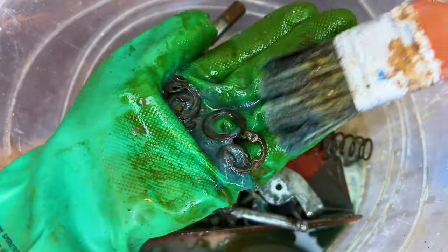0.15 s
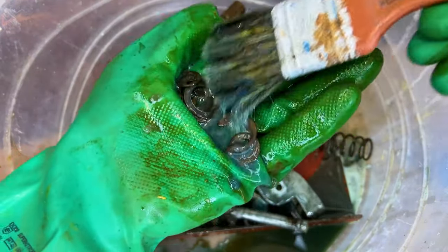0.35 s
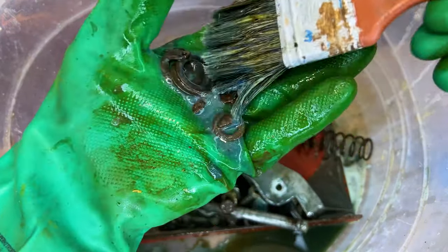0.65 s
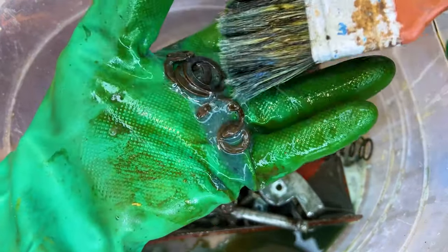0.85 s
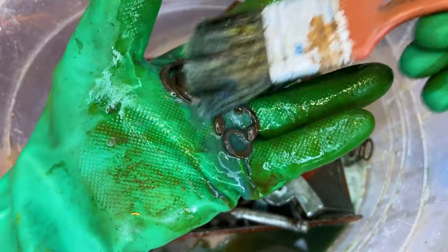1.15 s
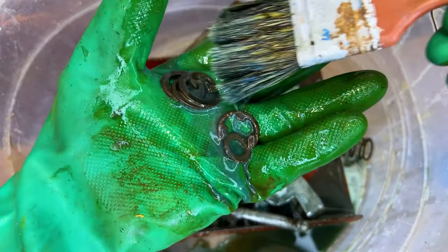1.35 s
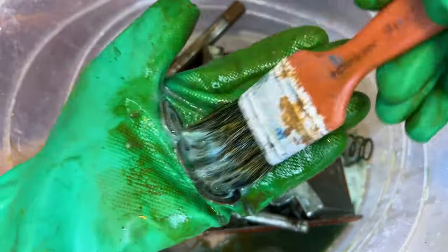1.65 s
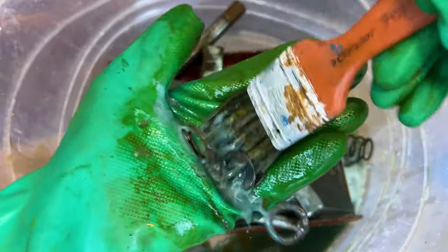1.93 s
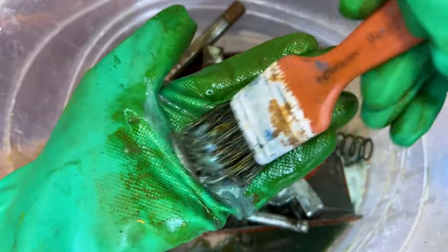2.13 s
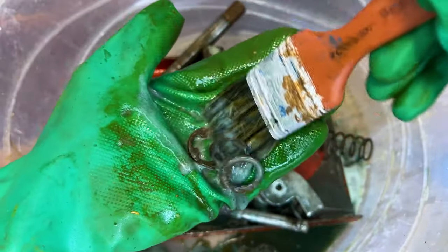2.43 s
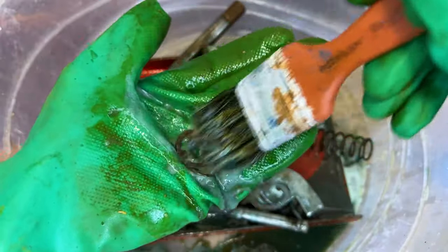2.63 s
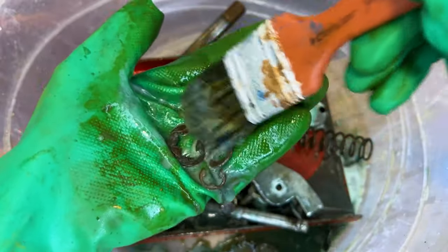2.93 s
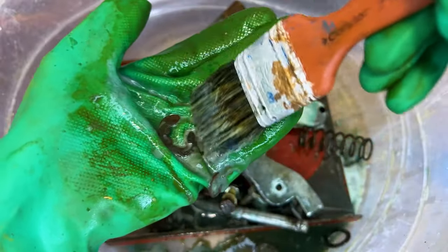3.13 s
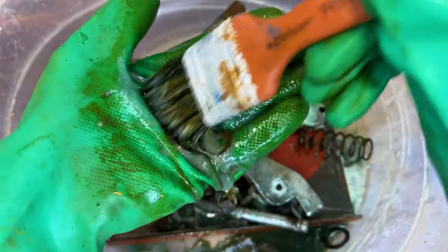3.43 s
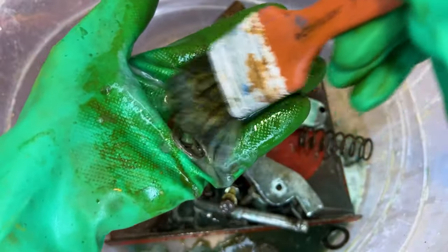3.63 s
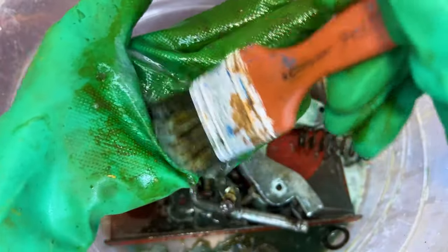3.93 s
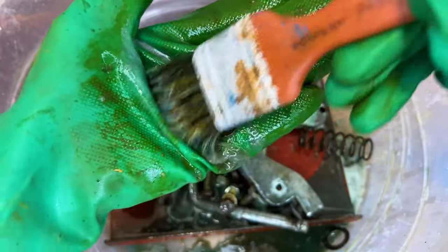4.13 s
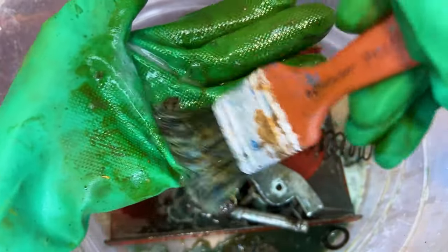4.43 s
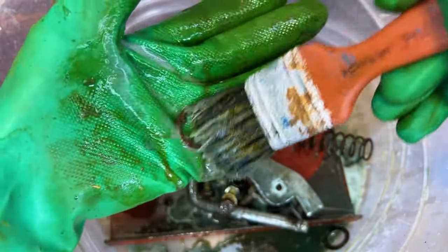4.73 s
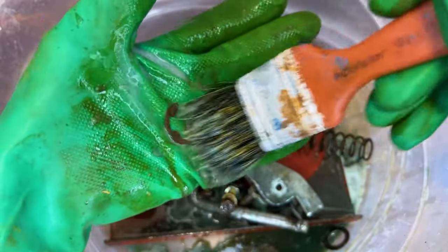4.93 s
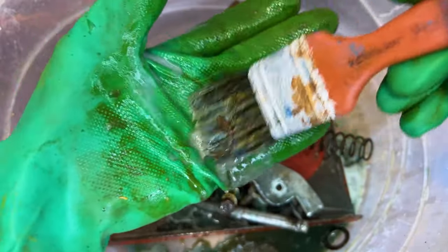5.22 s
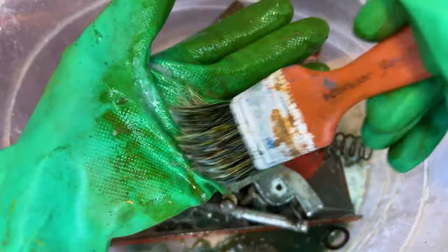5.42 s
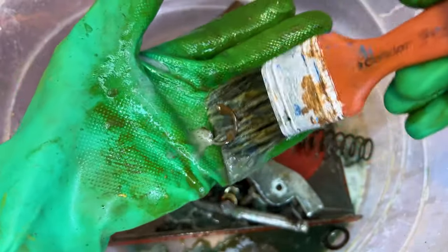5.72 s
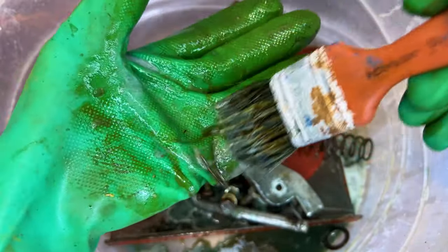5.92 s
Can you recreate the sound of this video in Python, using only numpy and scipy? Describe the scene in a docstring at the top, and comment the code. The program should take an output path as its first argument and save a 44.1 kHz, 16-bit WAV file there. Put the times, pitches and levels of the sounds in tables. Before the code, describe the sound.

In a quiet workshop with a faint machine hum, wet bristles hiss and crackle over small washers, heard up close. Thin clinks and squelches accompany the first strokes, then the rubbing becomes constant. Two loud metal clanks land in the tub less than a second apart, and a third follows later, each with a short room echo. Soft scrubbing and occasional drips continue afterwards.

```python
"""A hard-walled workshop hums faintly. Close by, from 0.2 s, a wet paintbrush dabs at steel washers
in a gloved palm over a plastic tub: bristles hiss and crackle, liquid squelches, washers clink,
drips fall. From 1.4 s the brush stays on the palm and rubs between strokes.
At 2.1, 2.8 and 4.2 s heavier metal clanks down and rings through the room; the scrubbing runs to 6 s."""
import sys
import numpy as np
from scipy import signal
from scipy.fft import rfft, irfft
from scipy.io import wavfile
from scipy.ndimage import uniform_filter1d

SR = 44100
rng = np.random.default_rng(int(sys.argv[2]) if len(sys.argv) > 2 else 0)


def master(y):
    """Save y as 16-bit WAV."""
    cut = np.clip(np.atleast_2d(y).T, -1, 1)
    pcm = np.round(cut * 32767)  # scale
    wavfile.write(sys.argv[1], SR, pcm.astype(np.int16))


N = 267671
TIME_S = np.arange(N) / SR

# still room air: (frequency [Hz], gain [dB])
AIR_SPECTRUM = [(20, 3), (40, -1.5), (70, -0.5), (160, -10), (300, -8.5), (1200, -14.5), (4000, -21),
                (4900, -15), (6000, -21.5), (12000, -17), (16000, -26.5)]
# faint microphone rumble and hiss: (frequency [Hz], gain [dB])
MIC_NOISE_SPECTRUM = [(30, 1.5), (300, -5.5), (1000, -17), (3600, -63), (4750, -10.5), (5500, -7),
                      (6100, -23), (6800, -18), (8100, -20), (9500, -55)]
# machine hum: (time [s], low tone [dB], high tone [dB])
HUM_LEVELS = [(0, -88, -84.5), (1.2, -89, -80.5), (2.1, -86, -72), (3.599, -76, -77.5), (4.6, -98, -69.5),
              (5.1, -77.5, -80.5), (6.0, -74, -86)]
# brush strokes: (start [s], length [s], relative hiss [dB], relative squelch [dB])
STROKES = [(0.18, 0.12, -58.5, -67), (0.245, 0.14, -57.5, -59), (0.555, 0.14, -56.5, -59.5),
           (0.743, 0.057, -62.5, -74), (0.952, 0.19, -58, -63), (1.189, 0.17, -58.5, -63.5),
           (1.45, 0.025, -55, -74), (1.496, 0.025, -52.5, -62.5), (1.555, 0.021, -47, -49.5),
           (1.625, 0.05, -49.5, -44.5), (1.702, 0.1, -57, -66), (1.767, 0.049, -49.5, -51.5),
           (1.862, 0.028, -65, -47), (1.897, 0.033, -49, -54), (2.025, 0.044, -42, -49),
           (2.38, 0.052, -53, -55.5), (2.526, 0.065, -50.5, -54.5), (2.644, 0.051, -52.5, -52.5),
           (3.01, 0.15, -56, -53.5), (3.208, .1, -53.5, -53), (3.449, 0.12, -54.5, -55.5),
           (3.73, 0.14, -58, -57), (3.899, 0.06, -51, -57.5), (4.058, 0.14, -54.5, -60),
           (4.246, 0.051, -51, -53), (4.41, .15, -50.5, -55.5), (4.688, 0.067, -51.5, -54.5),
           (4.85, 0.057, -60, -59), (4.95, 0.056, -51.5, -58), (5.06, 0.017, -52, -56),
           (5.134, 0.049, -51, -53.5), (5.323, 0.038, -67, -70), (5.394, 0.029, -54, -54),
           (5.6, 0.14, -56, -57.5), (5.85, 0.039, -57.5, -55), (6.028, 0.044, -53, -74)]
# rubbing between strokes: (time [s], hiss [dB])
RUBBING = [(1.42, -100), (1.46, -64), (1.6, -63.5), (2.0, -56.5), (2.8, -57), (3.2, -59.5), (3.6, -53.5),
           (4.6, -55.5), (5.2, -57), (5.5, -53.5), (6.02, -59.5)]
# brush spectra: (frequency [Hz], gain [dB])
BRISTLE_SPECTRUM = [(3000, -15.5), (5600, -15.5), (7000, -6), (8600, -1), (10700, 3.5), (12200, 1.5),
                    (13700, -7.5), (16000, -16)]
LIQUID_SPECTRUM = [(250, -26), (600, -7.5), (1200, -2), (1900, -5), (2700, -4), (4400, -2.5), (5600, -11),
                   (8000, -15.5)]
# washer clinks: (time [s], relative level [dB], tilt [dB/octave], struck washer, ring re contact [dB])
CLINKS = [(0.2673, -18, 7.5, "small", -1), (0.275, -21.5, 1, "thin", -17), (.33, -22.5, -1.5, "thin", -16),
          (.341, -23.5, -1, "small", -3), (0.3596, -17, 0.5, "thin", -5), (0.9867, -26.5, 1, "small", 3.5),
          (1.001, -22.5, 6, "thin", -9), (1.2301, -17, 1.5, "thin", -5.5), (1.3338, -24, 6, "thin", -14),
          (1.8207, -22, 4, "small", -2), (1.879, -27, -3, "large", -5), (2.19, -8, 4.5, "large", -2.5),
          (2.315, -19.5, 2.5, "small", -12), (2.346, -24.5, -1, "small", 0.5),
          (2.9932, -11.5, -1, "small", 0), (3.552, -22.5, 2, "small", -23), (3.6512, -18.5, 1, "thin", -9)]
# washer contact spectrum: (frequency [Hz], gain [dB])
CLINK_SPECTRUM = [(500, -15.5), (1300, -2), (2500, -3.5), (3700, 1.5), (5900, -9.5), (7500, -3),
                  (8600, 3.5), (11500, 1), (13500, -9), (16000, -16)]
# washer modes: (frequency [Hz], relative level [dB], t60 [s])
LARGE_WASHER_MODES = [(8440, 0, .2), (8570, -6, .08), (10500, -11, .25), (11210, -1, .15)]
SMALL_WASHER_MODES = [(7520, -2, .035), (8480, -3, .03), (8760, 0, .045)]
THIN_WASHER_MODES = [(2300, -11, .03), (3800, -6, .02), (4765, -14, .1), (8900, -4, .03), (12310, 0, .13)]
# drips and bursting suds: (time [s], relative level [dB], pitch [Hz])
DRIPS = [(0.608, -45, 1280), (.616, -45.5, 735), (1.6374, -38, 2100), (1.859, -38, 1720),
         (3.089, -33.5, 1240), (3.109, -30.5, 1090), (3.558, -46, 380), (3.982, -46.5, 567),
         (4.647, -44.5, 1120), (5.402, -46, 1520), (5.634, -40, 1290)]
# heavy clanks and rattles, rings re contact:
# (time [s], relative level [dB], tilt [dB/octave], shell ring [dB], plate ring [dB], bar ring [dB])
CLANKS = [(2.0658, -1.5, 2, -23.5, -4.5, -31), (2.1172, 3, -1, -13.5, -6, -13.5),
          (2.1302, 2.5, -5.5, -21, -11.5, -18), (2.252, -11.5, -5, -14, -7, -8),
          (2.833, 1, 0.1, -24, -22, -5.5), (2.856, -9, 0.5, -17, -19, -9),
          (2.9195, -15.5, -7, -21, -11, -29), (4.1531, 1, 0.5, -13.5, -20, -10.5),
          (4.2122, -16.5, -5.5, -23, -21, -20), (4.2664, -18.5, -8.5, -41, -2, -15),
          (4.3076, -17, -3.5, -25, -10, -25)]
# heavy contact spectrum: (frequency [Hz], gain [dB])
CLANK_SPECTRUM = [(40, -30), (80, -27), (160, -24.5), (240, -41.5), (400, -23), (560, -13.5), (780, -6),
                  (1300, -0.5), (2100, -2), (4300, -5), (6000, -17), (10200, -5.5), (13000, -13.5),
                  (16000, -35)]
# heavy metal modes: (frequency [Hz], relative level [dB], t60 [s])
SHELL_MODES = [(318, -14, .12), (389, -2, .14), (440, 1, .055)]
PLATE_MODES = [(620, -12, .22), (717, -11, .08), (943, -5, .04), (1216, -1, .08), (1368, 2, .12),
               (1500, -5, .04), (1800, -5, .04), (2500, -5, .05), (2950, -6, .05)]
BAR_MODES = [(780, 0, .05), (880, -3, .03), (2250, -5, .02), (2700, -5, .02), (3790, 1, .022),
             (4050, 1, .022), (4550, -3, .015)]
# reverb decay: (frequency [Hz], t60 [s])
ROOM_T60 = [(70, 0.97), (170, 0.64), (350, 0.41), (1000, 0.44), (2500, 0.51), (5000, 0.45), (10000, 0.35),
            (16000, 0.19)]
# reverb spectrum: (frequency [Hz], gain [dB])
ROOM_SPECTRUM = [(75, 9.5), (105, -20), (160, 6), (220, 16.5), (400, 0.5), (1500, -2), (4000, -5.5),
                 (6000, 1.5), (10000, -9), (16000, 3)]


def from_db(db):
    """Decibels to gain."""
    return 10 ** (np.asarray(db) / 20)


def unit_rms(x):
    """Scale to mean power 1."""
    return x / np.sqrt(np.mean(x ** 2) + 1e-20)


def unit_energy(x):
    """Scale to total energy 1."""
    return x / np.sqrt(np.sum(x ** 2) + 1e-20)


def at_hz(points, hz):
    """Table lookup on a log-frequency axis."""
    points_hz, values = np.transpose(points)
    return np.interp(np.log(hz + 1), np.log(points_hz), values)


def curves(rows):
    """Columns of a timed table, interpolated per sample."""
    times_s, *columns = np.transpose(rows)
    return [np.interp(TIME_S, times_s, column) for column in columns]


def add(mix, start_s, sound):
    """Mix a sound in at start_s."""
    part = mix[max(round(start_s * SR), 0):][:len(sound)]
    part += sound[:len(part)]


def coloured(x, spectrum, tilt_db_oct=0, fft_size=4096):
    """Minimum-phase filter, tilted above 700 Hz."""
    hz = abs(np.fft.fftfreq(fft_size, 1 / SR))
    gain_db = at_hz(spectrum, hz) + tilt_db_oct * np.log2(np.maximum(hz, 700) / 700)
    log_response = np.conj(signal.hilbert(np.log(from_db(gain_db))))
    taps = np.fft.ifft(np.exp(log_response)).real
    return signal.oaconvolve(x, taps[:fft_size // 2])[:len(x)]


def flutter(depth_db, samples):
    """Gain with smooth random swells."""
    drift = uniform_filter1d(uniform_filter1d(rng.standard_normal(N), samples), samples)
    return from_db(depth_db * unit_rms(drift))


def background():
    """Still air and the wavering hum of distant machines."""
    air = from_db(-67) * unit_rms(coloured(rng.standard_normal(N), AIR_SPECTRUM))
    hum = np.zeros(N)
    for hz, db in zip((118.4, 145.3), curves(HUM_LEVELS)):
        tone = np.sqrt(2) * np.sin(2 * np.pi * hz * TIME_S)
        hum += from_db(db) * flutter(depth_db=2.2, samples=4000) * tone
    return air + hum


def pressure(length_s, attack_s=0.035, ease_db_per_s=18, lift_db_per_s=286):
    """Stroke gain: the brush presses in, eases along the sweep, lifts."""
    t = np.arange(0, length_s + 0.3, 1 / SR)
    attack = np.sin(np.pi / 2 * np.minimum(t / attack_s, 1)) ** 2
    fade_db = ease_db_per_s * t + lift_db_per_s * np.maximum(t - length_s, 0)
    return attack * from_db(-fade_db)


def scrubbing_db(wetness_db=-3.5):
    """Hiss and squelch levels: strokes on top of an unsteady hand's rubbing."""
    rubbing = from_db(curves(RUBBING)[0]) * flutter(depth_db=3, samples=2000)
    hiss_power = rubbing ** 2
    squelch_power = (from_db(wetness_db) * rubbing) ** 2
    for start_s, length_s, hiss_db, squelch_db in STROKES:
        stroke = pressure(length_s)
        add(hiss_power, start_s, (from_db(hiss_db) * stroke) ** 2)
        add(squelch_power, start_s, (from_db(squelch_db) * stroke) ** 2)
    return 10 * np.log10([hiss_power, squelch_power])


def grains(per_s, spread_db):
    """Random clicks of uneven size."""
    size = from_db(spread_db * np.minimum(rng.exponential(1, N), 4))
    return unit_rms(size * rng.choice([-1, 1], N) * (rng.random(N) < per_s / SR))


def chatter(t60_s, samples=2048):
    """Decaying contact noise with a near-flat spectrum."""
    fade = from_db(-60 * np.arange(samples) / SR / t60_s)
    x = rng.standard_normal(samples) * fade
    for _ in range(3):
        whitened = irfft(np.exp(1j * np.angle(rfft(x))))
        x = whitened * fade ** 0.051
    return x


def bristles():
    """Bristles flick over steel and rubber; stiff tufts snap free."""
    flicks = grains(per_s=9000, spread_db=2.5) * flutter(depth_db=1.35, samples=250)
    releases = grains(per_s=25, spread_db=2.4)
    snaps = signal.oaconvolve(releases, unit_energy(chatter(t60_s=0.012)))[:N]
    return unit_rms(coloured(flicks + from_db(-13) * snaps, BRISTLE_SPECTRUM))


def bubble(hz, decay_cycles, rise):
    """An air pocket rings briefly, rising in pitch."""
    t = np.arange(int(5 * decay_cycles / hz * SR)) / SR
    age = t * hz / decay_cycles
    envelope = (1 - np.exp(-2 * age)) * np.exp(-age)
    return unit_energy(envelope * np.sin(2 * np.pi * hz * t * (1 + rise * age)))


def wet_pocket(centre_hz=1900, width_hz=294):
    """Clicks excite a wandering resonance in the liquid under the bristles."""
    clicks = grains(per_s=3000, spread_db=4.5)
    hz = centre_hz * flutter(depth_db=0.4, samples=1500)
    carrier = np.exp(2j * np.pi * np.cumsum(hz) / SR)
    pole = np.exp(-np.pi * width_hz / SR)
    return 2 * (carrier * signal.lfilter([1 - pole], [1, -pole], clicks / carrier)).real


def squelch(level_db):
    """Tiny bubbles burst in the liquid film; harder pressing brings out the wet pocket."""
    suds = np.zeros(N)
    for hz in np.geomspace(800, 4500, 24):
        pops = grains(per_s=14, spread_db=3.5)
        suds += signal.oaconvolve(pops, bubble(hz, decay_cycles=2.6, rise=0.02))[:N]
    fizz = from_db(-10) * unit_rms(suds) + grains(per_s=6000, spread_db=-2)
    film = unit_rms(coloured(fizz * flutter(depth_db=2, samples=500), LIQUID_SPECTRUM))
    pocket = unit_rms(coloured(wet_pocket(), LIQUID_SPECTRUM))
    press = from_db(np.minimum(0.5 * (level_db + 47.5), 0))
    return from_db(level_db - 3) * (film + press * pocket) / np.hypot(1, press)


def brush():
    """Scrubbing drives bristle hiss and liquid squelch."""
    hiss_db, squelch_db = scrubbing_db()
    return from_db(hiss_db) * bristles() + squelch(squelch_db)


def ring(modes, samples=22050):
    """Decaying modes; weights vary with where the blow lands."""
    hz, db, t60_s = np.transpose(modes)[:, :, None]
    t = np.arange(samples) / SR
    weights = rng.choice([-1, 1], db.shape) * from_db(db + rng.standard_normal(db.shape))
    partials = weights * from_db(-60 * t / t60_s) * np.cos(2 * np.pi * hz * t)
    return unit_energy(partials.sum(0))


def blows(rows, spectrum, contact_t60_s, bodies=()):
    """Per row: contact chatter plus the ring of any bodies given."""
    out = np.zeros(N)
    for time_s, db, tilt_db_oct, *rings_db in rows:
        contact = unit_energy(coloured(chatter(contact_t60_s), spectrum, tilt_db_oct))
        add(out, time_s, from_db(db) * contact)
        for modes, ring_db in zip(bodies, rings_db):
            add(out, time_s, from_db(db + ring_db) * ring(modes))
    return out


def clinks(scrape_lead_s=0.0055, neighbour_db=-13):
    """The brush flips a washer over its neighbours: scrape, tick, glove-damped ring."""
    washers = {"large": LARGE_WASHER_MODES, "small": SMALL_WASHER_MODES, "thin": THIN_WASHER_MODES}
    tick_rows, scrape_rows = [], []
    for time_s, db, tilt_db_oct, struck, ring_db in CLINKS:
        rings_db = [ring_db + neighbour_db * (name != struck) for name in washers]
        tick_rows.append((time_s, db, tilt_db_oct, *rings_db))
        scrape_rows.append((time_s - scrape_lead_s, db - 12.5, tilt_db_oct))
    ticks = blows(tick_rows, CLINK_SPECTRUM, contact_t60_s=0.029, bodies=washers.values())
    scrapes = blows(scrape_rows, CLINK_SPECTRUM, contact_t60_s=0.025)
    return from_db(2.5) * (ticks + scrapes)


def drips():
    """Per drip: one bubble and a soft splash."""
    out = np.zeros(N)
    for time_s, db, hz in DRIPS:
        add(out, time_s, from_db(db + 12.5) * bubble(hz, decay_cycles=1.12, rise=0.01))
        splash = unit_energy(coloured(chatter(t60_s=0.026), LIQUID_SPECTRUM))
        add(out, time_s, from_db(db - 9) * splash)
    return out


def clanks():
    """Heavy metal lands: bright crack, dense crash, ring of hollow shell, plate and bar."""
    bodies = (SHELL_MODES, PLATE_MODES, BAR_MODES)
    crashes = blows(CLANKS, CLANK_SPECTRUM, contact_t60_s=0.029, bodies=bodies)
    crack_rows = [(time_s, db - 6, tilt_db_oct + 1.5) for time_s, db, tilt_db_oct, *_ in CLANKS]
    cracks = blows(crack_rows, CLANK_SPECTRUM, contact_t60_s=0.0016)
    return from_db(5) * (crashes + cracks)


def workshop_reverb(x, delay_s=0.00057, build_s=0.013, samples=44100):
    """Dense wall reflections build fast; each band decays at its own rate."""
    hz, t, bands = signal.stft(rng.standard_normal(samples), SR, nperseg=512)
    gain_db = at_hz(ROOM_SPECTRUM, hz)[:, None] - 60 * t / at_hz(ROOM_T60, hz)[:, None]
    tail = signal.istft(bands * from_db(gain_db), SR, nperseg=512)[1][:samples]
    onset = np.clip((np.arange(samples) / SR - delay_s) / build_s, 0, 1)
    return signal.fftconvolve(x, unit_energy(tail * onset))[:N]


def scene():
    """Hand work, clanks and room centred; microphone self-noise differs between channels."""
    hand_work = brush() + clinks() + drips()
    heavy_metal = clanks()
    reverb = workshop_reverb(from_db(-5) * hand_work + from_db(-3.5) * heavy_metal)
    mid = hand_work + heavy_metal + reverb + background()
    mic_noise = from_db(-78) * unit_rms(coloured(rng.standard_normal(N), MIC_NOISE_SPECTRUM))
    return np.array([mid + mic_noise, mid - mic_noise])


def record(dry):
    """Soft clip, then low-pass."""
    ceiling, cutoff_hz = 0.85, 15950
    rounded = ceiling * np.tanh(dry / ceiling)
    taps = signal.firwin(401, cutoff_hz, window=("kaiser", 8), fs=SR)
    return signal.oaconvolve(rounded, taps[None], "same")


dry = scene()
out = record(dry)
master(out)
```